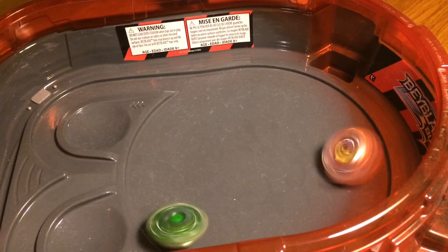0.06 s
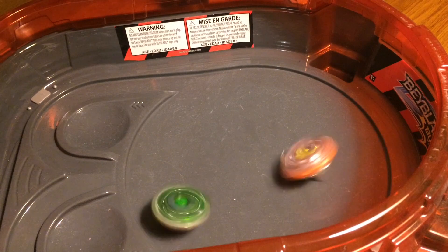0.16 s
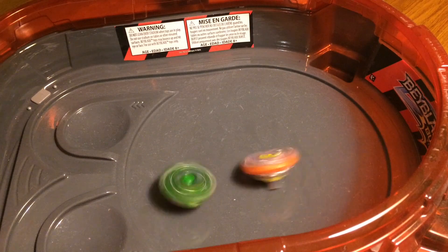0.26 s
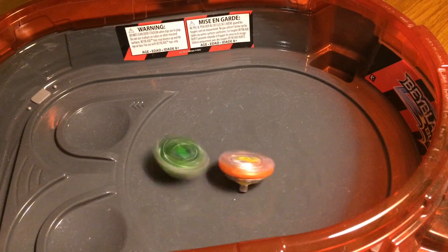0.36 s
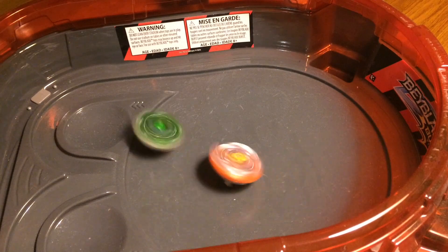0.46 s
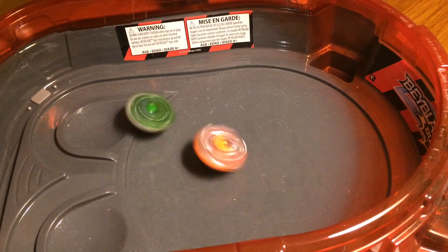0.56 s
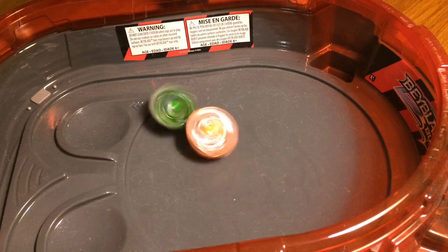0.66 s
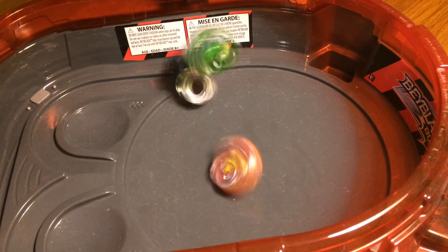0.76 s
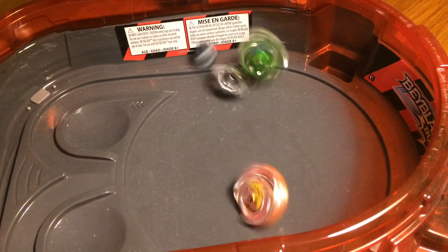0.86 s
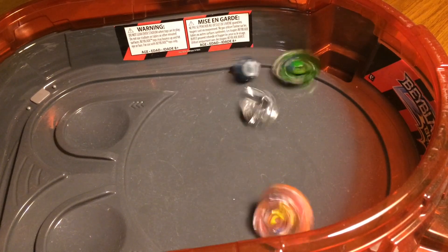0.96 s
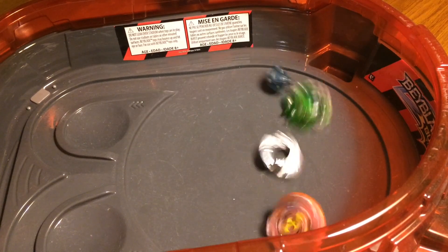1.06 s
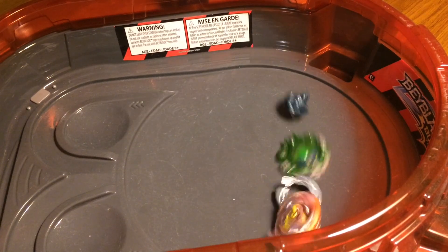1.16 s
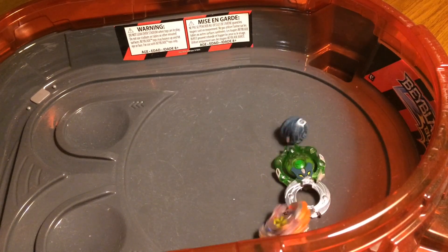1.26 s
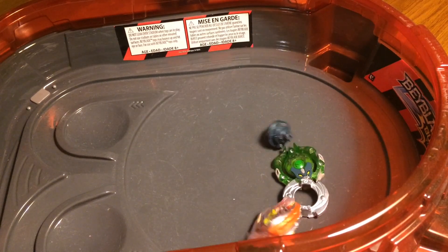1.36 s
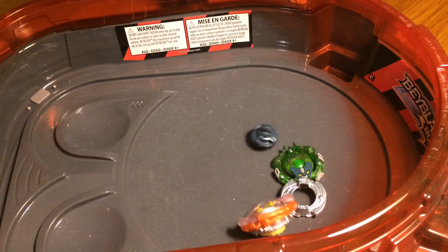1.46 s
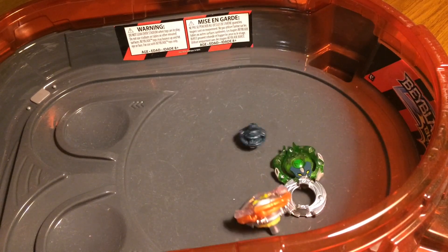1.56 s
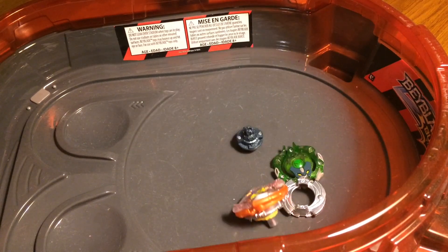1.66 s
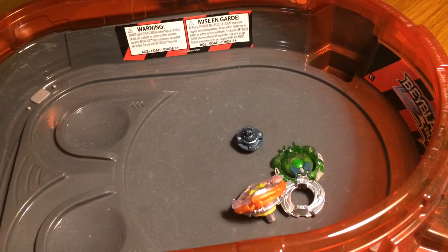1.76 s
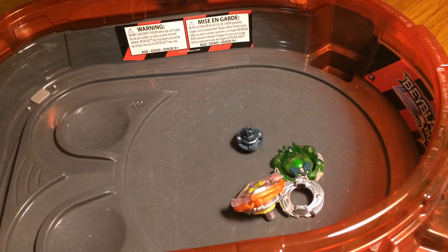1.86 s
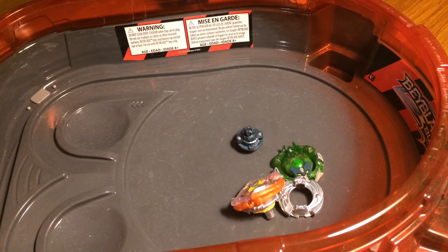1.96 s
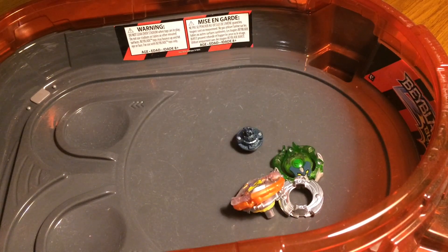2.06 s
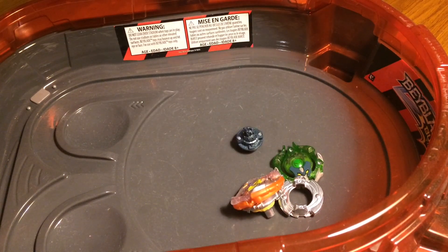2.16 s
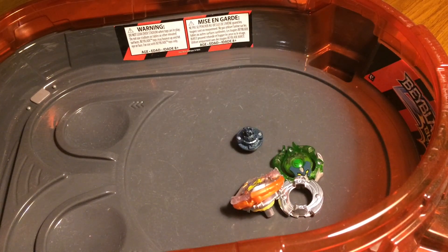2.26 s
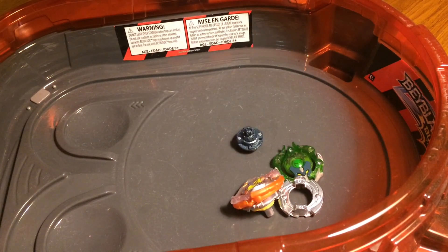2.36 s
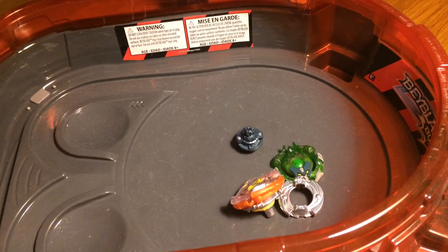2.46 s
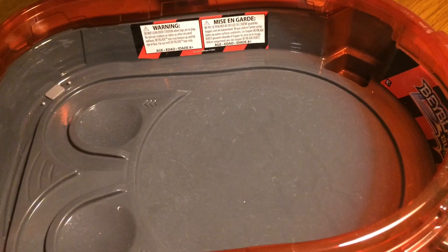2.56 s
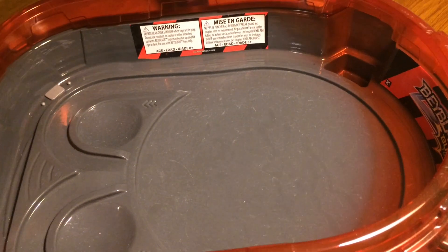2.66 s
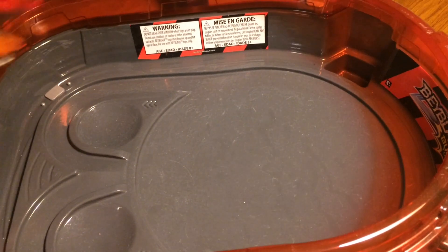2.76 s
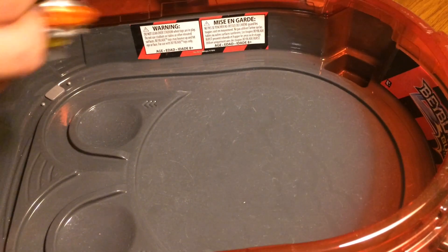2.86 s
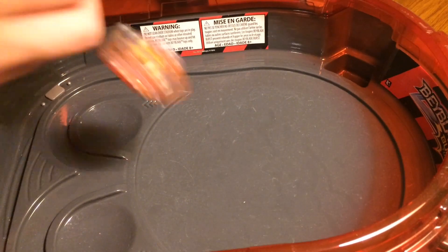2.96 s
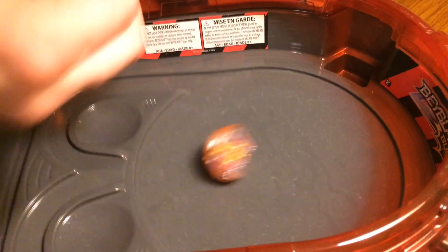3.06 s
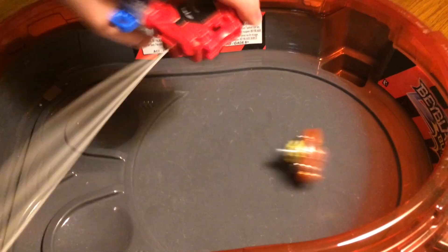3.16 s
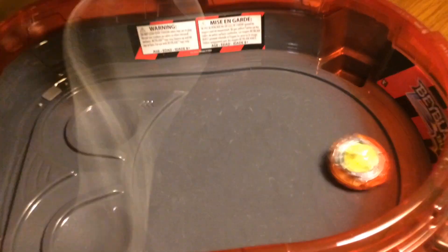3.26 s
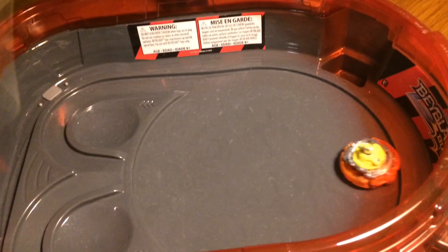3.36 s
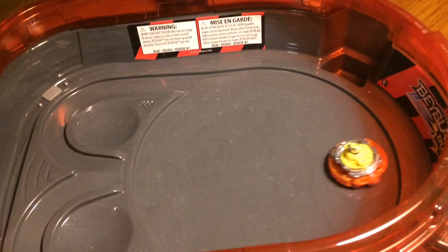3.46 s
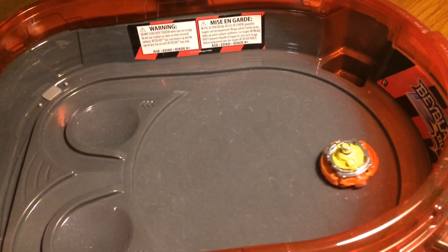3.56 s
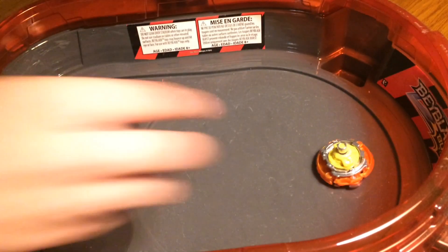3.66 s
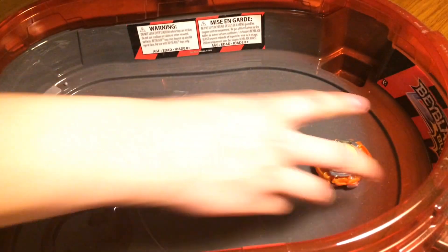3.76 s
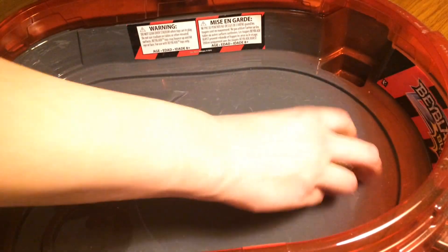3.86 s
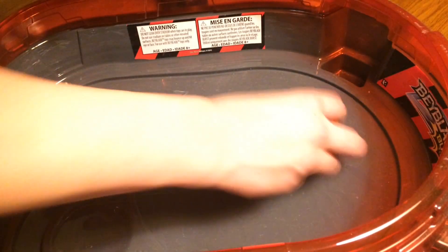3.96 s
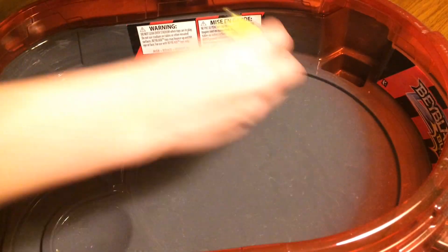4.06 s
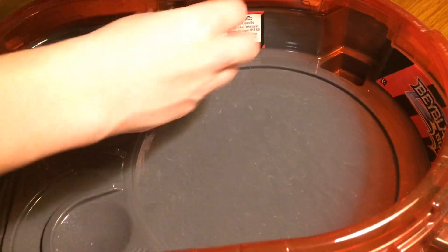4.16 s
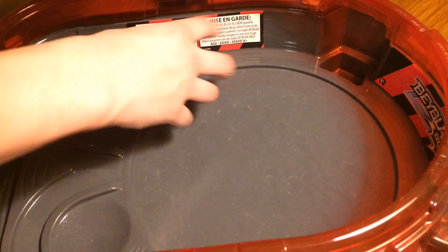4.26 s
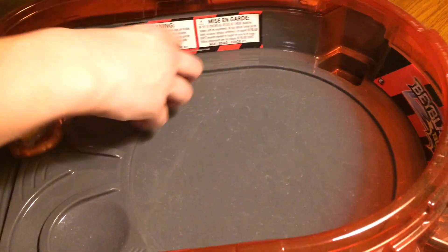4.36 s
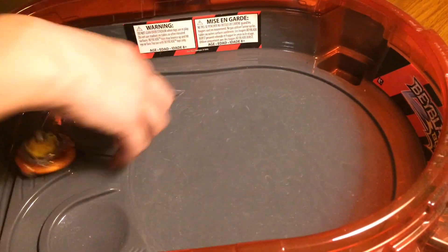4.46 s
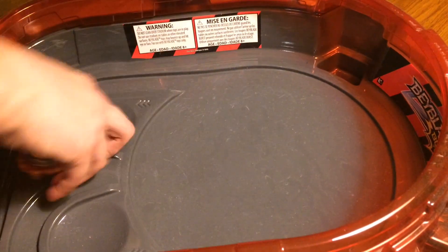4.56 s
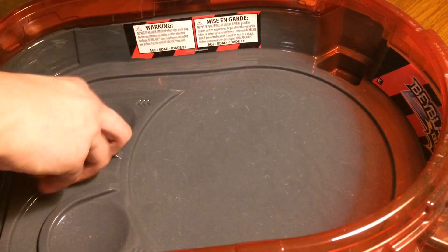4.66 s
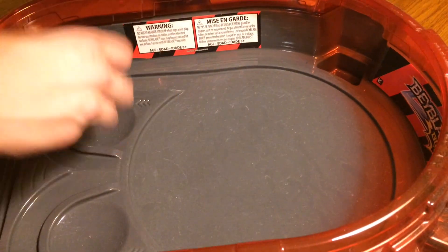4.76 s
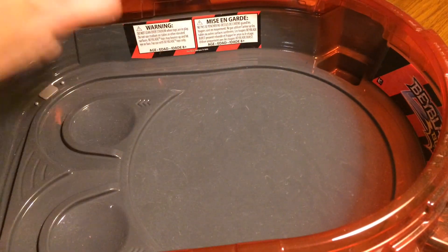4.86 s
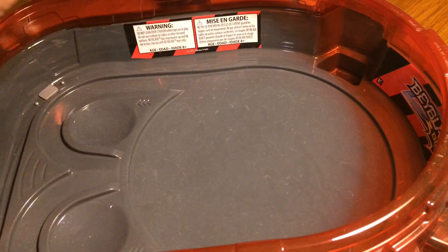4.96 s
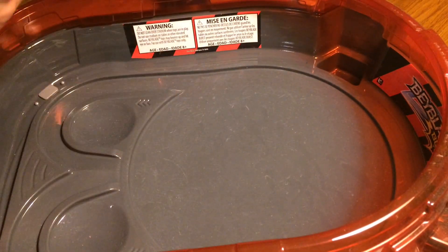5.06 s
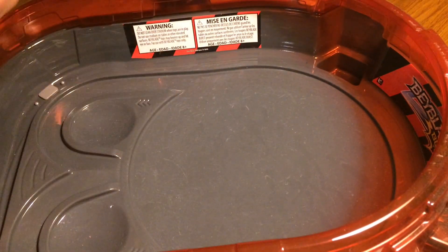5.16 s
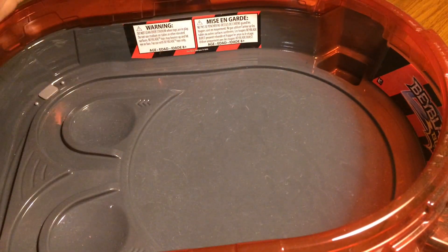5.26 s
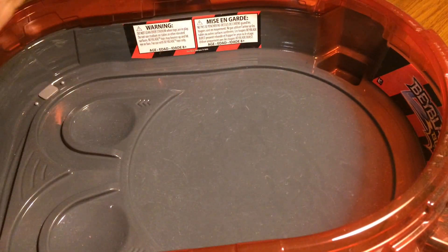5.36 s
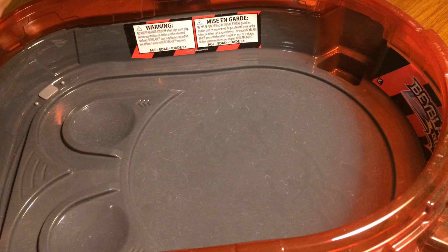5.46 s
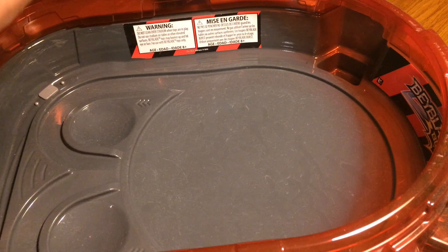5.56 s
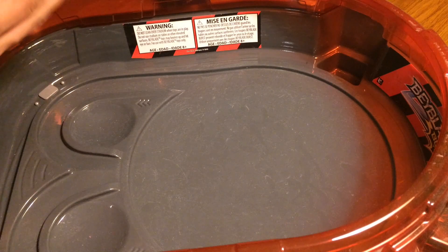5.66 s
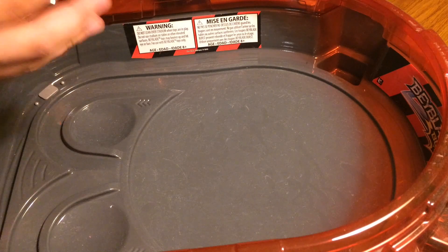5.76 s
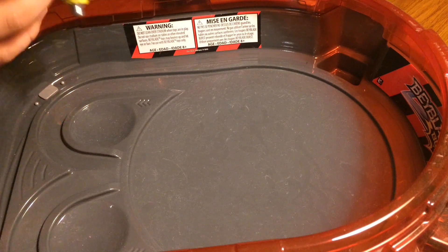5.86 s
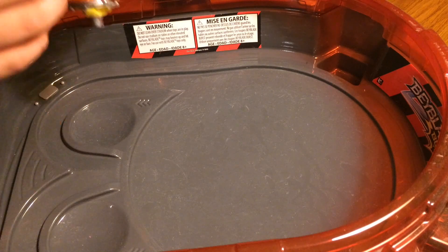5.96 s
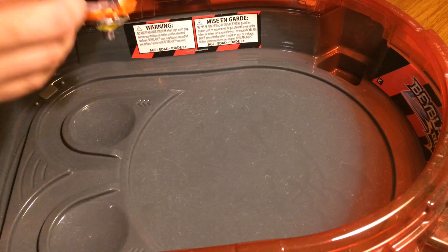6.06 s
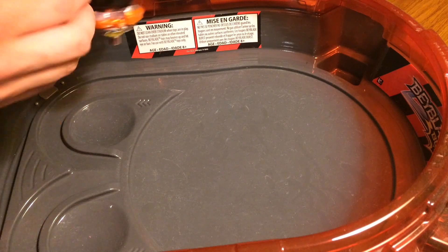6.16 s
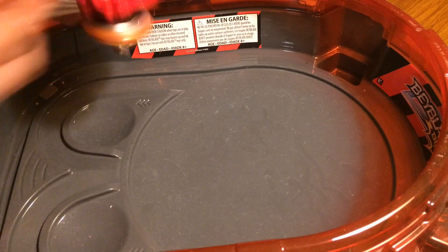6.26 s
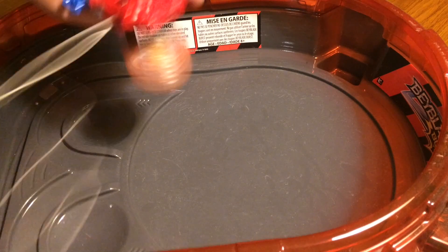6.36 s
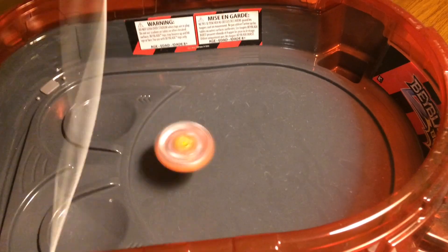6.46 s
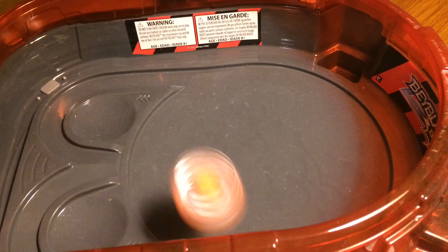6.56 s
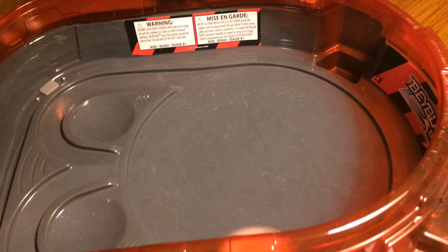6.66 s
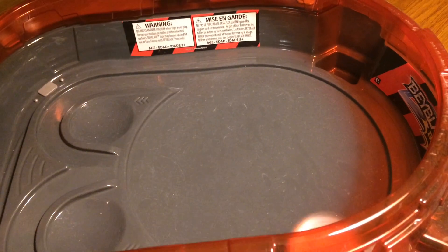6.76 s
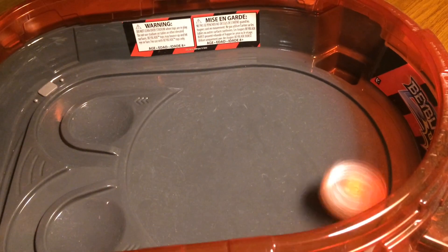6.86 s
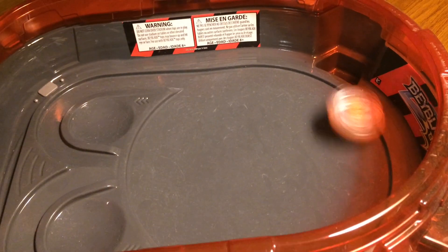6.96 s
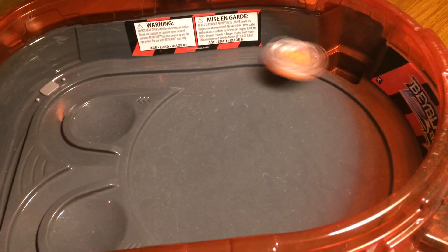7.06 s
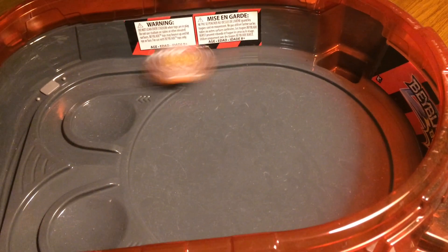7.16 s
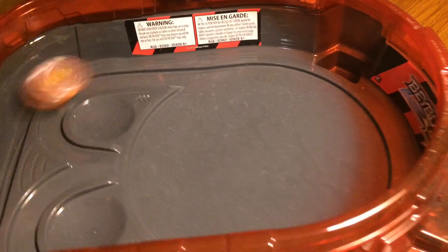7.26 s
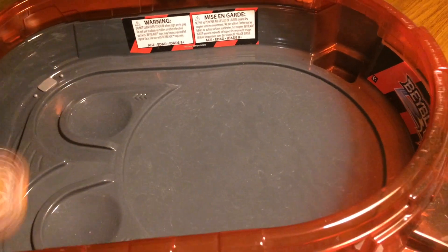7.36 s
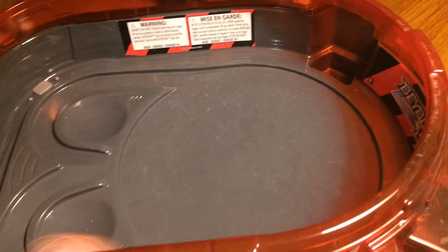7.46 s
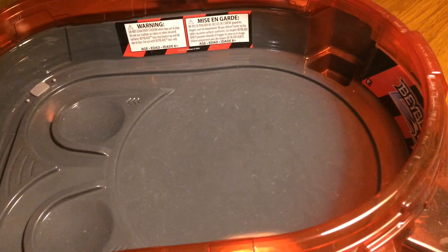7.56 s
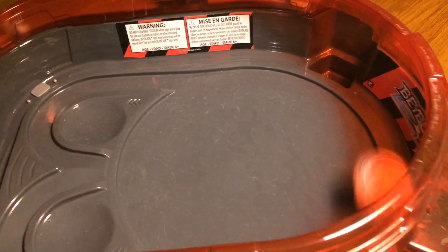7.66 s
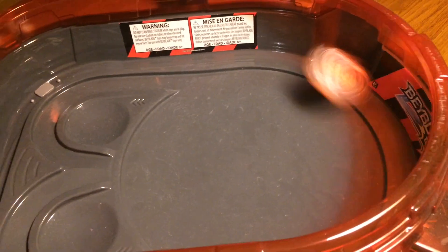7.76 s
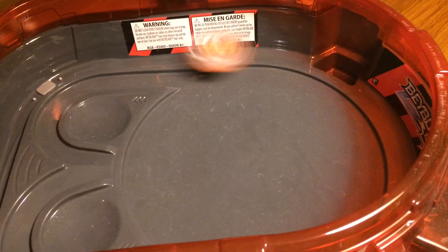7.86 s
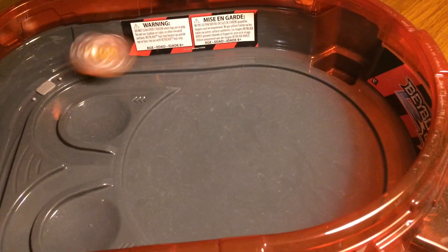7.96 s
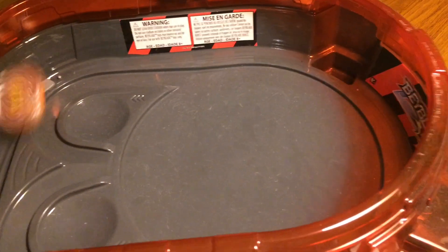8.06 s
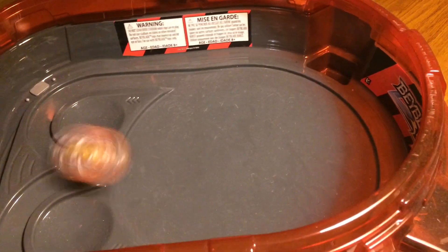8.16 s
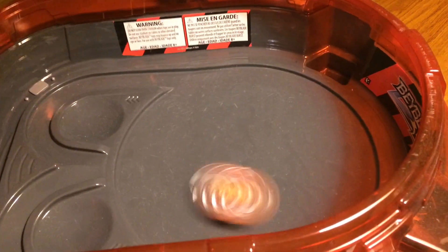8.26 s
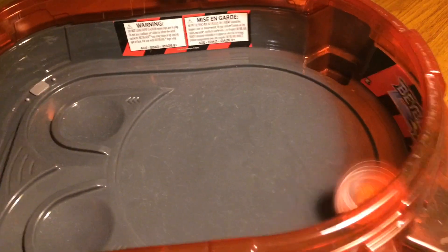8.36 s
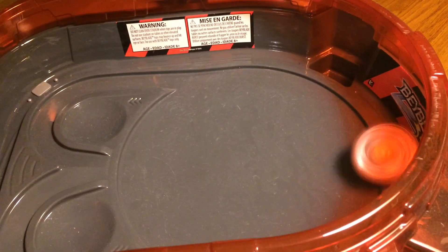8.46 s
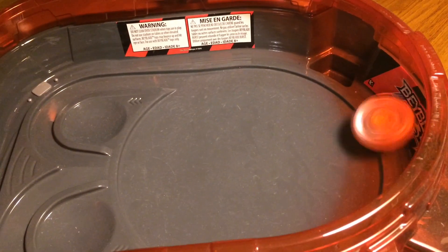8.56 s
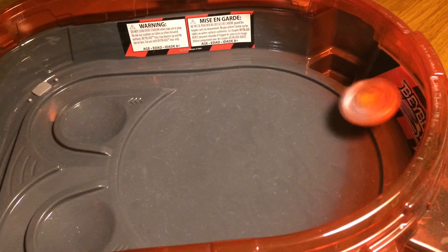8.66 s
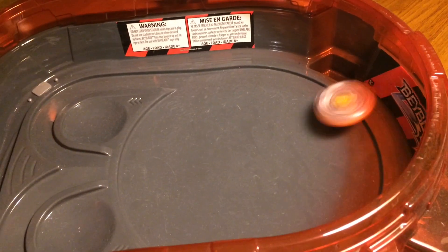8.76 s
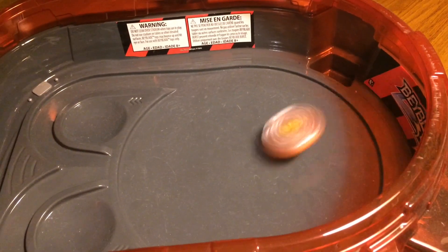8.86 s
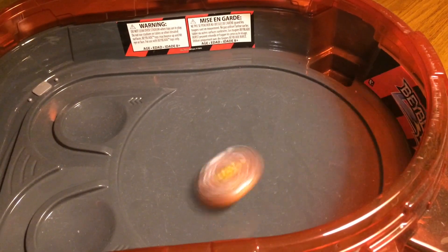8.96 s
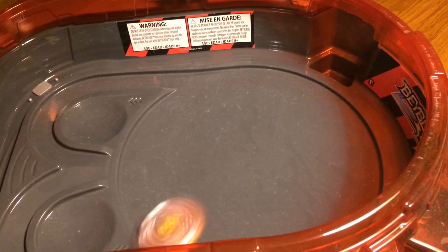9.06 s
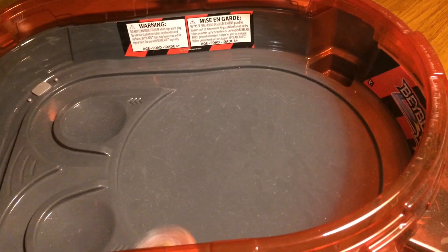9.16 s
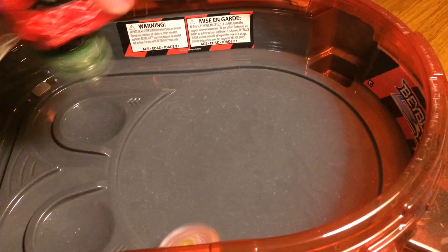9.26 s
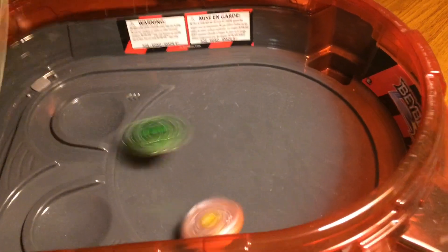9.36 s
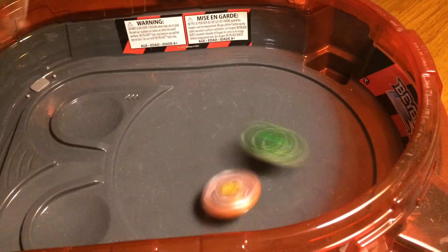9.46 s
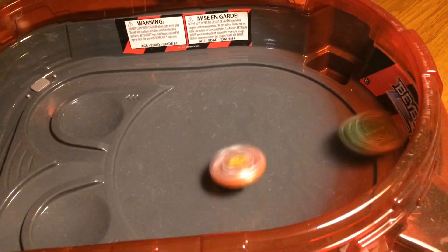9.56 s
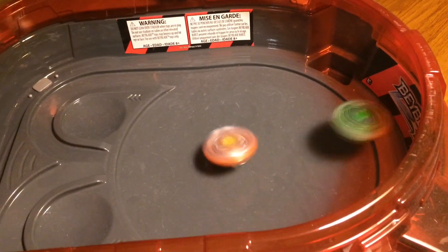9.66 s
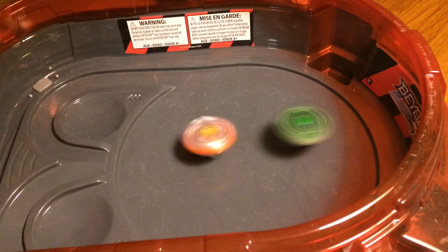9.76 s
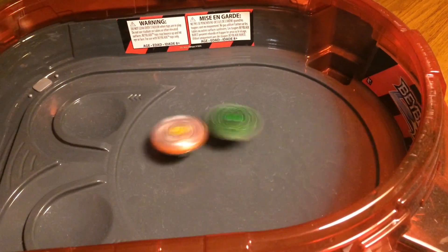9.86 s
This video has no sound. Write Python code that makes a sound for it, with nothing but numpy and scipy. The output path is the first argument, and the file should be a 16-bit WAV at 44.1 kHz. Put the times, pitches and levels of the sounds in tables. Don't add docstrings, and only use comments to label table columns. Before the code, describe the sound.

Plastic tops clash and settle, parts click in the hands, a ripcord whirs, and a relaunched top scrapes and knocks hard around its bowl.

```python
import sys
import numpy as np
from scipy import signal
from scipy.fft import rfft, irfft
from scipy.io import wavfile
from scipy.ndimage import uniform_filter1d

SR = 44100
rng = np.random.default_rng(int(sys.argv[2]) if len(sys.argv) > 2 else 0)


def magnitude_from_level(level_db):
    exponent = np.asarray(level_db, float) / 20
    return 10 ** exponent


def to_wav(s):
    ch = np.atleast_2d(s).T
    pcm = np.round(np.clip(ch, -1, 1) * 32767)
    wavfile.write(sys.argv[1], SR, pcm.astype(np.int16))


N = 437031


def evened(x):
    return x / np.sqrt(np.mean(x ** 2) + 1e-20)


def peaked(x):
    return x / (abs(x).max() + 1e-20)


def read(points, hz):
    f, value = np.transpose(points)
    return np.interp(np.log(hz + 1), np.log(f + 1), value)


def curve(points, t):
    return np.interp(t, *np.transpose(points))


def add(mix, s, sound):
    part = mix[max(round(s * SR), 0):][:len(sound)]
    part += sound[:len(part)]


def wander(size, width):
    return evened(uniform_filter1d(rng.standard_normal(size), width))


def colour(x, points):
    hz = abs(np.fft.fftfreq(4096, 1 / SR))
    log_gain = np.log(magnitude_from_level(np.maximum(read(points, hz), -80)))
    taps = np.fft.ifft(np.exp(np.conj(signal.hilbert(log_gain)))).real[:2048]
    return signal.oaconvolve(x, taps)[:len(x)]


def high(x, hz):
    return signal.sosfilt(signal.butter(3, hz, "high", fs=SR, output="sos"), x)


def ring(x, modes):
    out = np.zeros(len(x))
    for hz, db, t60 in modes:
        r = 10 ** (-3 / (t60 * SR))
        w = 2 * np.pi * min(hz, SR / 2.2) / SR
        out += magnitude_from_level(db) * signal.lfilter([np.sin(w)], [1, -2 * r * np.cos(w), r * r], x)
    return out


def sweep(x, hz, width_hz):
    turn = np.exp(2j * np.pi * np.cumsum(hz) / SR)
    r = np.exp(-np.pi * width_hz / SR)
    return (turn * signal.lfilter([(1 - r) ** 2], [1, -2 * r, r * r], x / turn)).real


RISE_S = 0.00031


def chatter(length, size, spread_db=4.0, first=0.26, rise=RISE_S):
    t = np.arange(size) / SR
    unevenness = np.repeat(rng.standard_normal(size // 70 + 1), 70)[:size]
    grit = rng.standard_normal(size) * magnitude_from_level(spread_db * unevenness)
    swell = 1 - np.exp(-t / max(rise, 1e-5))
    return grit * swell * (np.exp(-t / length) + first * np.exp(-t / 0.002))


def grains(per_s, spread_db):
    size = magnitude_from_level(spread_db * np.minimum(rng.exponential(1, N), 5))
    return size * rng.choice([-1., 1.], N) * (rng.random(N) < per_s / SR)


# frequency_hz, density_db_per_hz
AIR = [(15, -63), (25, -33), (90, -6), (108, 1.5), (159, -12), (197, -0.5), (238, -20.5), (296, -9.5),
       (378, -15), (510, -20), (787, -25.5), (14800, -42.5), (16500, -59)]
# frequency_hz, level_db
HUM = [(118.4, -58.5), (193.8, -67.5), (290.7, -65.5)]
# centre_s, half_width_s, level_db
GAP = (2.585, .015, -14)


def air():
    t = np.arange(N) / SR
    hz = np.fft.rfftfreq(N, 1 / SR)
    noise = irfft(rfft(rng.standard_normal(N)) * magnitude_from_level(read(AIR, hz)), N)
    floor = magnitude_from_level(-60) * evened(noise)
    for f, db in HUM:
        drift = 0.74 + .5 * wander(N, 1500)
        floor = floor + magnitude_from_level(db) * drift * np.sin(2 * np.pi * f * t) * 0.46
    s, width, db = GAP
    return floor * magnitude_from_level(db * np.exp(-((t - s) / width) ** 2))


# frequency_hz, t60_s
ROOM = [(250, 0.12), (660, 0.36), (1740, 0.29), (4590, 0.41), (12100, 0.36)]


def room(x):
    taps = np.zeros(SR // 2)
    at = np.arange(150, len(taps) - 20, 20)
    taps[at + rng.integers(0, 20, len(at))] = rng.choice([-1., 1.], len(at))
    hz, t, z = signal.stft(taps, SR, nperseg=256)
    decay = magnitude_from_level(-60 * t / read(ROOM, hz)[:, None])
    tail = signal.istft(z * decay, SR, nperseg=256)[1]
    return signal.fftconvolve(x, tail / np.linalg.norm(tail))[:N]


# start_s, level_db, gear_whine_hz
PULLS = [
    [(3.2, -31.5, 2517), (3.25, -26, 5390), (3.305, -21, 10190), (3.312, -10, 9850), (3.328, -32.5, 11250)],
    [(3.335, -35.5, 9530), (3.38, -28, 9080), (3.46, -34.5, 8470), (3.535, -39.5, 7900)],
    [(6.315, -42.5, 1063), (6.335, -29, 2300), (6.36, -21.5, 4545), (6.368, -14, 5300),
     (6.385, -16.5, 6800), (6.405, -11, 8100), (6.42, -14.5, 8870), (6.429, -30.5, 9640)],
    [(9.22, -47, 1932), (9.27, -30.5, 4200), (9.287, -23, 5000), (9.293, -18, 5590), (9.316, -14, 6400),
     (9.323, -13.5, 6800), (9.343, -17, 7700), (9.352, -16, 8030), (9.41, -19.5, 8310)],
]
# frequency_hz, density_db_per_hz
ZIP = [(180, -39.5), (300, -25.5), (1660, -2.5), (2090, -13), (2840, -1.5), (4170, -2), (7630, 1.5),
       (15200, -5.5), (17500, -14.5)]


def pulls():
    out = np.zeros(N)
    for rows in PULLS:
        s, db, hz = np.transpose(rows)
        t = np.arange(s[0], s[-1], 1 / SR)
        size = len(t)
        speed = np.interp(t, s, hz)
        turn = 2 * np.pi * np.cumsum(speed) / SR
        teeth = np.cos(turn) + 0.2 * np.cos(turn / 2)
        rasp = evened(colour(chatter(9.7, size, spread_db=-1.0, first=0), ZIP))
        rasp = rasp - (1 - np.clip(speed / 9000, 0, 1)) * high(rasp, 4200.)
        if speed[-1] > speed[0]:
            rasp = rasp + 0.57 * evened(ring(rasp, [(2850, 0.5, 0.009), (3600, -3, .005), (4550, -8, .006)]))
        rasp = high(rasp, 600.) + 0.16 * evened(sweep(rasp, 1100 + .12 * speed, 350.))
        whine = evened(wander(size, 160) * teeth)
        hump = evened(wander(size, 14) * teeth)
        slip = magnitude_from_level(2 * wander(size, 220))
        tone = (np.gradient(speed) > 0) * (0.47 * whine + 0.33 * hump)
        level = magnitude_from_level(np.interp(t, s, db)) * slip * signal.windows.tukey(size, .03)
        add(out, s[0], level * (rasp + tone))
    return out


# start_s, peak_db, pitch_hz
CLICKS = [(1.888, -27.5, 1930), (2.018, -46.5, 850), (2.524, -51, 1250), (2.874, -49, 2040),
          (2.973, -38.5, 5650), (3.146, -35, 4530), (3.545, -11.5, 5760), (3.592, 0.5, 5440),
          (4.1892, -8.5, 1500), (4.2802, -9, 2160), (4.2924, -7, 2920), (5.028, -8.5, 2850),
          (5.147, -26, 2930), (5.193, -39.5, 2600), (5.272, -51, 6040), (5.297, -47.5, 3000),
          (5.311, -38, 3300), (5.352, -11.5, 3500), (5.36, -11, 3270), (5.368, -12, 4027),
          (5.374, -6.5, 3770), (5.46, -22.5, 3340), (5.476, -40.5, 2000), (5.501, -13, 2844),
          (5.552, -43, 1390), (5.6, -54, 1196), (5.688, -51, 3250), (5.746, -31.5, 2690),
          (5.765, -30, 2500), (6.295, -34, 2610), (6.312, -11.5, 3100), (8.5541, -10.5, 1430),
          (8.847, -17, 1500)]
# frequency_hz, density_db_per_hz
SNAP = [(350, -50), (900, -22), (2700, 5), (4400, -4), (6800, 0), (12500, -14.5), (15500, -12),
        (17500, -19.5)]
# frequency_hz, level_db, t60_s
HOUSING = (2680, -14, .003)


def clicks():
    out, tick = np.zeros((2, N)), np.eye(1, 3000)[0]
    for s, db, hz in CLICKS:
        firm = db > -30
        flurry = peaked(chatter(0.0083 * (1 if firm else 2.5), size=3000, first=0, rise=0))
        flurry[0] += 4 if firm else 2
        humps = [(hz, 0, 5 / hz), HOUSING]
        pair = []
        for x in (flurry, tick):
            hump = ring(ring(x, humps), humps)
            pair.append((1 if firm else .7) * evened(colour(x, SNAP)) + 1.3 * evened(hump))
        near = peaked(pair[0])
        add(out[0], s, magnitude_from_level(db) * near)
        add(out[1], s, magnitude_from_level(db) * np.std(near) * evened(pair[1]))
    return high(out, 970.0)


# start_s, peak_db
THUMPS = [(0.2198, -22), (0.536, -23), (.69, -19), (3.173, -13), (3.33, -15), (4.1894, -24), (4.301, -16),
          (4.704, -24), (6.523, -7.5), (6.739, -15), (7.219, -17), (8.33, -13.5), (8.849, -39),
          (9.099, -20), (9.358, -14)]


def thumps():
    out, t = np.zeros(N), np.arange(5000) / SR
    push = np.exp(-t / 0.0016) * t
    boom = peaked(high(ring(push, DRUM + [(75, -6.5, 0.02), (327, 5, 0.023)]), 67.0))
    for s, db in THUMPS:
        add(out, s, magnitude_from_level(db) * boom)
    return out


# frequency_hz, level_db, t60_s
LOOSE_RING = [(7860, -20, .3), (9450, -8, .4), (9700, -3, .3), (10600, -20, .25), (12660, -14, .17),
              (14080, 0, .2), (15500, -8, .17)]
SEATED_RING = [(5860, 1, .2), (7300, -10, .1), (9450, -10, .1), (12700, -2, .15), (12950, -6, .15),
               (14050, -2, .15)]
# (start_s, level_db)
HUB = ([(8000, 0, .12), (11600, -8, .03)], [(3.34, -24), (6.495, -24), (6.7, -36), (6.865, -27)])
LANDED_RING = ([(7350, 0, .2), (9450, 0.5, 0.23), (12700, 0.0026, .17), (14050, 0, .14)], [(3.172, -23.5)])
# start_s, level_db
RING_DROPS = [
    (.434, -30.5),
    (0.79, -25),
    (0.881, -32.5),
    (1.035, -33.5),
    (1.269, -22.5),
]
# start_s, level_db
RATTLES = [(4.29, -28), (4.375, -29), (4.49, -35.5), (7.098, -37.5), (7.414, -30), (8.035, -30.5),
           (8.69, -32.5), (8.965, -41.5), (4.33, -29.5)]


def chimes():
    out, tick = np.zeros(N), np.eye(1, 9000)[0]
    open_grab = [row for row in GRAB if row[0] < 4.5]
    # modes, knocks, ringing in dB re the blow
    struck = [(LOOSE_RING, BATTLE, -38.5), (LOOSE_RING, RING_DROPS, 0), (*LANDED_RING, 0),
              (SEATED_RING, RATTLES, 0), (*HUB, 0), (SEATED_RING, LANDINGS + open_grab, -31),
              (SEATED_RING, FIRST_LAPS + LATER_LAPS, -41.5)]
    for modes, knocks, share_db in struck:
        for s, db, *_ in knocks:
            luck = rng.standard_normal(len(modes))
            hit = [(f * (1 + 0.0057 * a), level + 2 * a, t60) for (f, level, t60), a in zip(modes, luck)]
            add(out, s, magnitude_from_level(db + share_db) * ring(tick, hit))
    return out


# start_s, peak_db, centre_hz,
# length_s
GRAZES = [(0.4336, -3, 8500, .003), (0.7474, -6, 6000, .004), (.77, -8, 6860, .004),
          (0.7773, -4, 9030, .004), (.789, -9, 7530, .005), (3.5915, -10, 11430, .003),
          (3.5915, -12, 15000, .003), (8.278, -35, 4000, .003), (3.54, -28, 5950, 0.0028),
          (7.716, -7, 2720, .006), (7.75, -15.5, 5300, 0.0018), (8.047, -8, 3540, .005),
          (9.305, -6.5, 4500, .004), (9.325, -6.5, 3500, .006), (9.575, -21, 5600, .008),
          (4.202, -19.5, 7000, 0.0024), (4.458, -22, 6200, 0.0042), (4.658, -28.5, 6400, .004),
          (4.747, -33.5, 6500, .003), (6.862, -9, 5470, .006), (7.092, -8, 7100, 0.0044),
          (7.169, -6.5, 7140, 0.0046), (7.346, -3, 8080, .004), (8.007, -23, 4500, .003),
          (8.021, -27, 4500, 0.0028), (8.136, -14, 6100, .004), (8.5, -21.5, 6700, .006),
          (8.617, -16.5, 7050, 0.0051), (8.936, -39, 6000, .003), (8.941, -34, 6000, .003)]


def grazes():
    out = np.zeros(N)
    for s, db, hz, length in GRAZES:
        flurry = chatter(length, size=1500, first=0, rise=0.0018)
        hump = [(hz, 0, 7.5 / hz)]
        add(out, s, magnitude_from_level(db) * peaked(ring(ring(flurry, hump), hump)))
    return high(out, 1800.)


# start_s, tip_pressure_db, skid_db
SHORT_SPINS = [
    [(0, -30.5, -6.5), (.5, -34.5, 1), (.62, -40, -6), (.84, -30, -8.5), (1.0, -23.5, -6.5),
     (1.24, -28, -2.5), (1.39, -31, -4), (1.46, -42, -13.5)],
    [(1.46, -43.5, -5.5), (1.78, -49, -2), (1.87, -71.5, 12), (2.1, -71, 3)],
    [(3.163, -31, -14.5), (3.2, -23, -10), (3.29, -27, -21), (3.4, -20.5, -4.5), (3.5, -39, 4.5),
     (3.56, -49, -1.5)],
    [(3.925, -38.5, -26), (3.97, -29.5, -39.5), (4.12, -71.5, 16)],
    [(4.19, -33.5, -18.5), (4.275, -39.5, -18), (4.31, -24, -17), (4.42, -28.5, -15.5), (4.56, -37, -17),
     (4.68, -42.5, -26), (4.84, -64, -17)],
    [(6.1, -78, 10), (6.31, -71.5, 18.5)],
]
LONG_SPIN = [(6.43, -31.5, 5.5), (6.5, -18, 1), (6.66, -45, 4.5), (6.76, -28.5, 0), (6.95, -32.5, -3.5),
             (7.3, -35.5, -22), (7.47, -23, 4), (7.6, -39, 2), (7.73, -15, -8.5), (7.87, -32.5, -7.5),
             (8.12, -31, -6.5), (8.9, -41.5, -13), (9.15, -27.5, -5.5), (9.34, -40, 7), (9.44, -14.5, -6),
             (9.54, -31, 0), (9.72, -25.5, 2), (9.91, -36, -12)]
# start_s, floor_drive_db
CENTRED = [(.3, -0.5), (.6, 11.5), (.85, 11.5), (1.2, 0.5), (3.17, 14.5), (3.55, -8), (3.95, 4.5),
           (6.55, 0.5), (7.1, 7.5), (7.75, -14), (8.3, 18), (8.7, 14), (9.15, 2.5), (9.45, 1.5),
           (9.91, 4.5)]
# start_s, pitch_hz
SKID_NOTE = [(0, 1500), (.5, 2200), (1.4, 1700), (3.4, 1500), (3.55, 2800), (6.45, 1500), (6.75, 2300),
             (6.95, 1700), (7.05, 2900), (7.3, 1500), (7.9, 2600), (8.5, 1500), (8.8, 1500), (9.05, 2600),
             (9.18, 2100), (9.5, 1600), (9.72, 1900), (9.9, 1600)]
# frequency_hz, density_db_per_hz
SCRAPE = [(120, -40.5), (200, 4), (291, 4), (566, -0.5), (900, -2.5), (1260, 0.5), (1410, -9), (1580, -3),
          (4000, -34), (5200, -35), (8800, -120)]


def rolls():
    t, levels = np.arange(N) / SR, np.zeros((3, N))
    for rows in SHORT_SPINS + [LONG_SPIN]:
        s, press_db, skid_db = np.transpose(rows)
        drone_db = -15 + 0.73 * press_db - 0.19 * skid_db + curve(CENTRED, s)
        inside = (t >= s[0]) & (t < s[-1])
        for level, db in zip(levels, (press_db, drone_db, press_db + skid_db)):
            level[inside] = magnitude_from_level(np.interp(t[inside], s, db))
    bumps = grains(4000, 2.9)
    scrape = evened(colour(bumps, SCRAPE))
    wobble = magnitude_from_level(3.3 * wander(N, 500))
    fizz = signal.lfilter([1], [1, -.55], grains(6000, 3.))
    note = sweep(fizz, curve(SKID_NOTE, t) * wobble ** 0.25, 1300)
    skid = evened(colour(fizz, CRACK)) + 0.89 * evened(note)
    layers = [high(scrape, 390.0) * wobble, high(ring(bumps, DRUM), 53.0), skid * wobble]
    return sum(uniform_filter1d(level, 200) * evened(x) for level, x in zip(levels, layers))


# frequency_hz, level_db
SHELL = [(370, -7.5), (500, 12), (620, 2), (740, 11), (950, 8.5), (1120, 12.5), (1300, 14), (1500, 10.5),
         (1720, -23), (2000, -11)]


def wall():
    luck = rng.standard_normal((len(SHELL), 2))
    return [(f * (1 + .07 * a), db + 3 * b, min(.9 / np.sqrt(f), .045)) for (f, db), (a, b) in zip(SHELL, luck)]


# frequency_hz, level_db, t60_s
DRUM = [(133, -14, 0.019), (164, 11.5, 0.068), (210, 0, 0.068)]
# frequency_hz, density_db_per_hz
CRACK = [(880, -35.5), (1500, 5.5), (1890, 12.5), (2500, 15.5), (2740, 13.5), (3310, 9.5), (12700, -2),
         (15200, -7.5), (17500, -8.5)]
# frequency_hz, t60_s
TOP = [(2150, .009), (2480, 0.014), (2780, 0.003), (3500, .007), (5500, .006), (7100, .005), (9200, 0.0028)]
# start_s, crack_peak_db, knock_db (shell re crack)
BATTLE = [(.0194, -22, 0.5), (.0388, -31.5, -3.5), (0.0583, -20, -6), (.1037, -32, -3), (0.136, -20.5, -1),
          (0.175, -25.5, -1.5), (0.2074, -31, 1), (0.2224, -21, -7), (0.2575, -33, -1.5), (0.34, -22, -10),
          (0.382, -13.5, -8.5), (0.537, -23.5, -1), (0.3695, -15.5, -4), (0.3875, -12.5, -2.5),
          (0.423, -12, -6), (0.4331, -8.5, -9), (0.6493, -17, -9.5), (0.6582, -13.5, -7.5),
          (0.6726, -14.5, -2.5), (0.748, -11, -17.5), (0.7585, 2, -25), (0.7755, -4.5, -10.5),
          (0.7973, -13, 1.5), (0.815, -6, -6), (0.85, -14, -6), (0.8776, -8, -3), (0.94, -5.5, -3.5),
          (0.969, -5.5, -8.5), (0.9778, -10, 4), (0.9916, -5.5, -9), (1.0317, -8, -19), (1.061, -8.5, -1),
          (1.1234, -12.5, -2.5), (1.1618, -18, -3), (1.256, -26.5, -5), (1.272, -8, -13.5),
          (1.369, -17, -3.5)]
# start_s, crack_peak_db
TOPPLE = [
    (1.5721, -18),
    (1.609, -21.5),
    (1.6353, -25),
    (1.6655, -27),
    (1.6936, -25.5),
    (1.714, -28),
]
# start_s, crack_peak_db, knock_db (shell re crack)
LANDINGS = [(3.167, -9.5, -14), (3.1708, -5.5, -2), (3.1901, -9.5, -2.5), (3.225, -13.5, 5.5),
            (3.277, -15.5, 0), (3.3084, -7.5, -14), (3.3346, -10.5, 5.5), (3.3429, -13, 0.5),
            (3.3501, -12, 0), (3.3673, -2.5, -6), (6.4293, 3, -13), (6.4594, 2, -15), (6.4874, -7, -11.5),
            (9.3484, -3.5, -8), (9.3733, -1, -6.5), (9.4191, 0, -8.5)]
# start_s, crack_peak_db, knock_db (shell re crack)
GRAB = [(3.935, -32.5, 2), (3.9458, -21.5, -14), (3.9579, -10, -6), (3.9964, -21, -13), (4.1889, -6, 2),
        (4.237, -14, 9.5), (4.2803, -8, -0.5), (4.2917, -5, -22), (4.3028, -9.5, 2.5), (4.3239, -7, -12.5),
        (4.372, -5.5, -1.5), (4.3891, -5, -5.5), (4.4314, -11.5, -7.5), (4.4913, -9.5, -3.5),
        (4.6365, -20.5, -1.5), (4.6971, -26, 8.5), (4.7098, -14.5, 2), (4.749, -37, 8)]
# start_s, crack_peak_db, knock_db (shell re crack), pitch_hz, brightness (-1 to 1)
FIRST_LAPS = [(6.5251, -6, -5.5, 1500, -.2), (6.576, -12, -5.5, 1656, -.3), (6.6713, -14, -29, 2995, -0.25),
              (6.696, 0, -15.5, 2790, .1), (6.79, -20.5, -2, 1041, -0.49), (6.8268, -2, -7, 1120, -0.15),
              (6.8358, -5.5, 1.5, 1060, -.3), (6.8618, -4, -9.5, 1160, 0.44),
              (6.9227, -19.5, -5.5, 990, -.6), (6.978, -25.5, -2, 1010, -0.15),
              (7.004, -18.5, -0.5, 480, -.1), (7.0968, -5, -8, 1120, 0.53), (7.146, -18, 3.5, 830, -0.65),
              (7.1642, -7.5, -4.5, 1200, 0.28), (7.1752, -11.5, -5, 1184, 0.38),
              (7.221, -16.5, -3.5, 490, -.3), (7.2712, -16.5, -8, 348, -0.77),
              (7.32, -18.5, -2, 370, -0.099), (7.341, -5.5, -7, 425, 0.46), (7.4138, 2, -8, 400, 0.018),
              (7.424, -4, -2.5, 1570, -.5), (7.5123, -2, -4, 803, -0.31), (7.6146, 0.5, -6.5, 1360, .1),
              (7.6829, -1.5, -5, 1310, 0.0056), (7.7134, -2, -2.5, 690, .1), (7.75, -4.5, -3.5, 546, -0.12),
              (7.7884, -12, 8, 1660, .1), (7.8135, -6.5, -3.5, 1310, 0.21), (7.892, -1, -5.5, 1190, .1)]
LATER_LAPS = [(8.0323, -2, -3.5, 1310, .1), (8.0429, -2.5, -4.5, 866, -.2), (8.0727, -6, -11, 1120, -.6),
              (8.086, -4, -4.5, 1200, -.5), (8.097, -5.5, -2.5, 1610, -.2), (8.1398, -0.5, -6, 795, .1),
              (8.184, -12, -3, 1300, -.4), (8.2151, -8, -2.5, 1770, -.1), (8.3165, -14, -25, 2200, .3),
              (8.329, -11, -23, 400, .1), (8.334, -12, -2.5, 400, -.1), (8.364, -11.5, -5, 490, .1),
              (8.414, -21.5, -2, 900, .1), (8.4439, -4, -4.5, 566, .1), (8.5528, -6, -1.5, 1330, -.4),
              (8.601, -2, -7.5, 850, .1), (8.6201, -15.5, 12, 910, .1), (8.652, -10.5, -4, 1250, .1),
              (8.689, -4.5, -1.5, 1280, .1), (8.7, -5.5, -3.5, 487, .1), (8.7499, -19, 5, 1460, .1),
              (8.8473, -20.5, 6.5, 348, .1), (8.9207, -16.5, -1.5, 356, .1), (8.965, -14.5, -11, 1230, .1),
              (9.058, -21.5, -17, 1980, -.5), (9.1926, -4.5, -8, 1140, .1), (9.271, -10, -19, 1450, .1),
              (9.289, -2, -6.5, 760, -.1), (9.568, -12, 3, 447, -0.24), (9.635, -16, -10, 1100, .1),
              (9.6584, -5.5, -6, 1480, .1), (9.677, -5, 0.5, 1590, -.3), (9.7, -12.5, 2.5, 1290, -.5),
              (9.7897, -16, 4.5, 1640, .1), (9.8758, -15, -1, 594, .1)]


def blows():
    crack, body, push = np.zeros(N), np.zeros(N), np.zeros(N)
    topple = [(s, db, -5) for s, db in TOPPLE]
    pressed = [(*row, 400) for row in GRAB]
    rim = FIRST_LAPS + LATER_LAPS
    groups = [("clash", BATTLE), ("floor", topple + LANDINGS + pressed), ("rim", rim)]
    for kind, (s, db, knock_db, *note) in [(kind, row) for kind, rows in groups for row in rows]:
        length = (0.016 if kind == "rim" else 0.014) * magnitude_from_level(0.82 * max(db, -11.))
        flurry = chatter(length, size=4000, rise=RISE_S * magnitude_from_level(-.6 * min(db, 0)))
        knock = peaked(ring(flurry, wall()))
        knock = knock + 0.17 * peaked(colour(flurry, SCRAPE))
        edge = 0.038
        if kind == "floor":
            knock = peaked(signal.lfilter([1], [1, -0.86], knock))
        elif kind == "clash":
            edge = 0.32 * np.clip(-knock_db / 10, 0, 1.7)
        else:
            edge = note[1]
        for hz in note[:1]:
            knock = knock + 1.5 * peaked(ring(flurry, [(hz, 0, .015), (1.13 * hz, -4, .012)]))
        hum = ring(flurry, [(f, 5 * rng.standard_normal(), t60) for f, t60 in TOP])
        snap = evened(colour(flurry, CRACK)) + 0.24 * evened(hum)
        snap = signal.lfilter([1, -max(edge, 0)], [1, min(edge, 0)], snap)
        add(crack, s, magnitude_from_level(db) * peaked(snap))
        add(body, s, magnitude_from_level(db + knock_db + 4.5) * peaked(knock))
        add(push, s, magnitude_from_level(db + knock_db) * peaked(flurry))
    return crack + high(body, 370.0) + magnitude_from_level(-39.5) * high(ring(push, DRUM), 54.0)


def scene():
    bowl = blows() + thumps() + grazes() + chimes() + rolls()
    near, to_room = clicks()
    cord = pulls()
    echo = room(magnitude_from_level(-10) * bowl + magnitude_from_level(-8.5) * to_room + magnitude_from_level(-6.5) * cord)
    return (bowl + near + cord + echo + air())[None]


def band_limit(x):
    return signal.sosfilt(signal.butter(12, 15950, fs=SR, output="sos"), x)


def record(dry):
    held = dry / (1 + abs(dry) ** 6) ** (1 / 6)
    held = signal.sosfilt(signal.butter(10, 15950, fs=SR, output="sos"), held)
    return band_limit(held)


dry = scene()
out = record(dry)
to_wav(out)
```